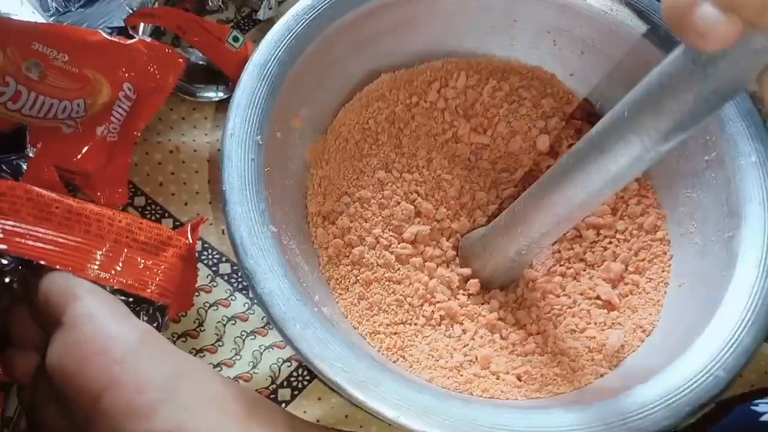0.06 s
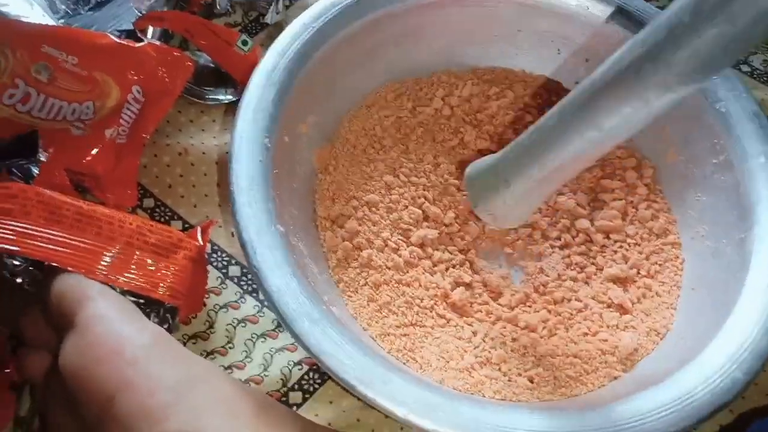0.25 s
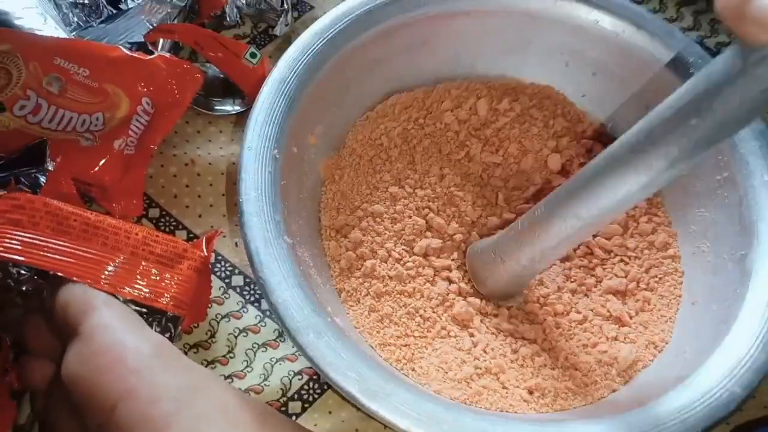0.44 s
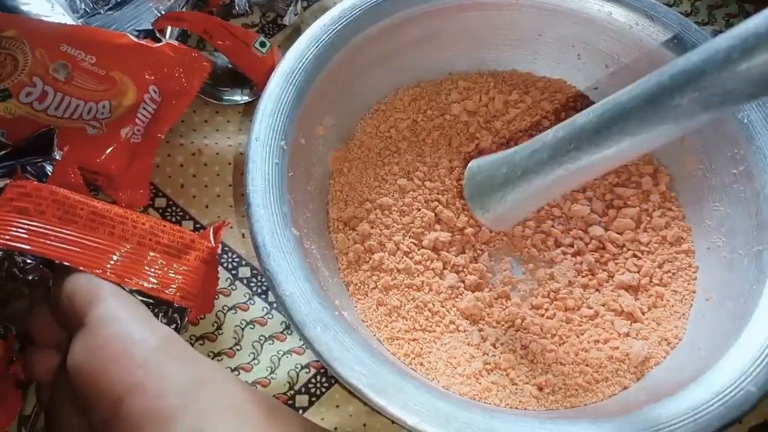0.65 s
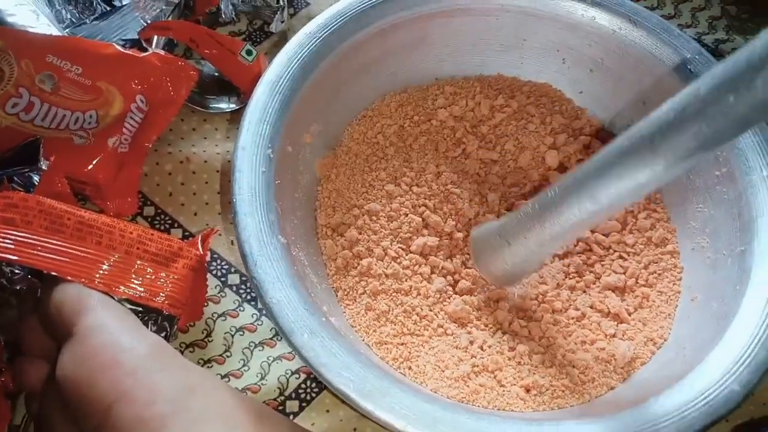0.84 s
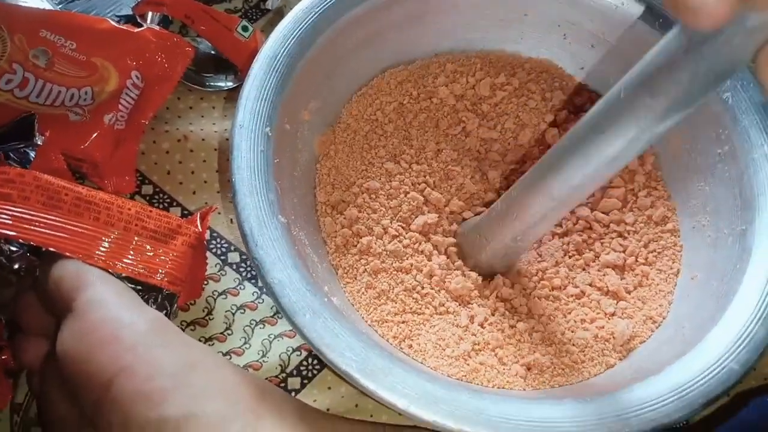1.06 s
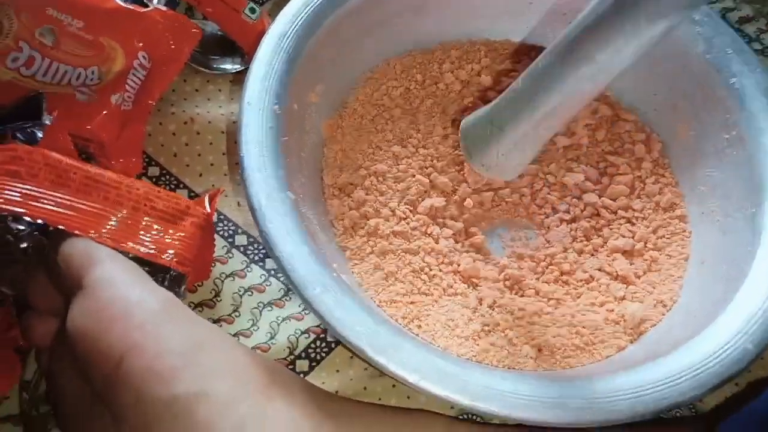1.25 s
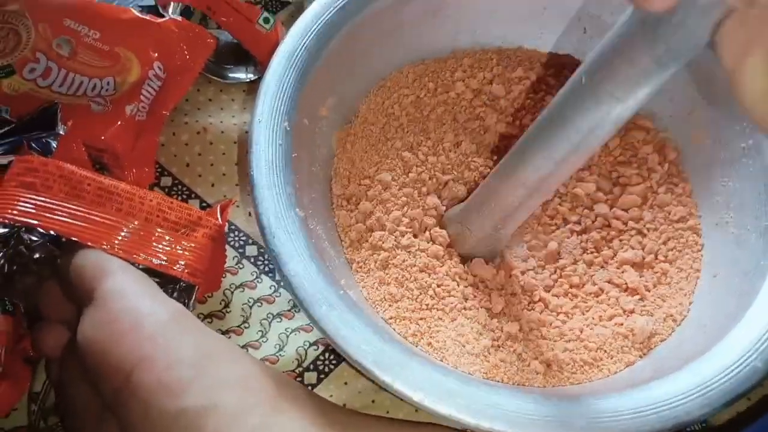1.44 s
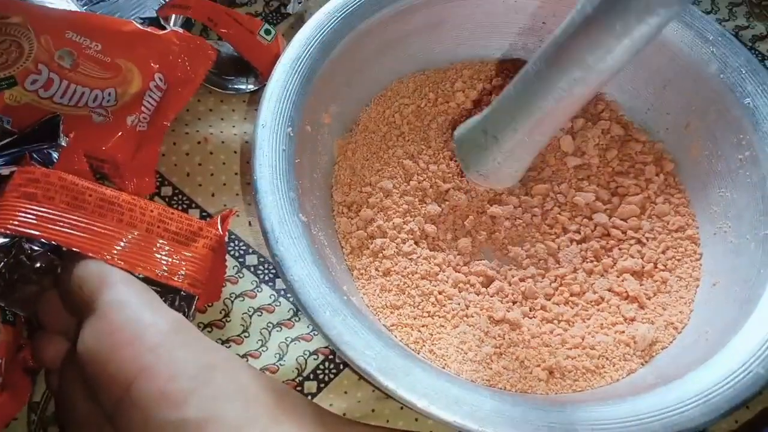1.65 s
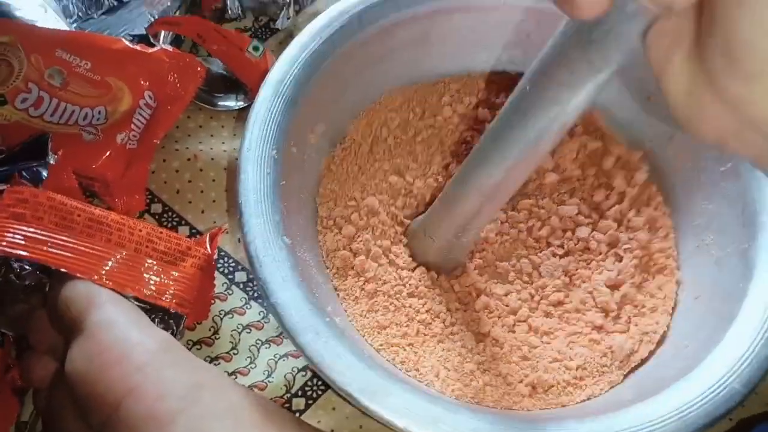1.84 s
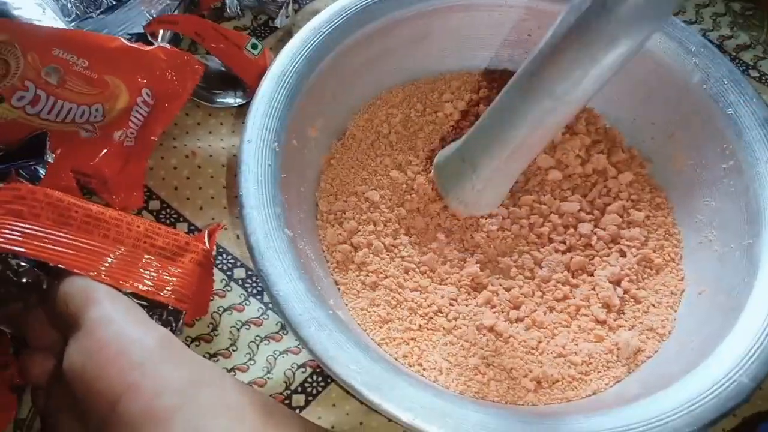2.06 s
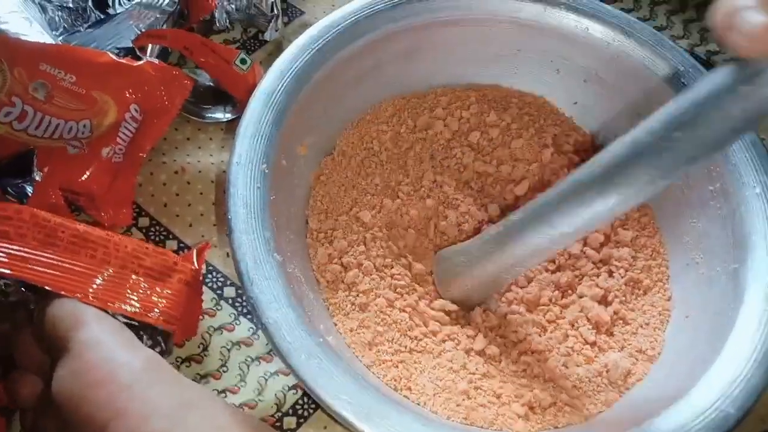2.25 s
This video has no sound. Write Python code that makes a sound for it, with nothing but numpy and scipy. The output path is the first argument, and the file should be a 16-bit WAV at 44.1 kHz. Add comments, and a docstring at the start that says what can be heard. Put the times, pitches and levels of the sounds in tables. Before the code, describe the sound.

A metal rod pounds dry biscuits in a metal bowl: six uneven blows, each a crunch, sharp crack and low thud, with light clinks and trickling crumbs between; close stereo microphone in a small kitchen.

```python
"""Pounding biscuits in a metal bowl

A metal rod strikes about three times a second, close by in a kitchen; the bowl stands on a covered surface.
Each blow crunches down through the crumbs and cracks on the bottom: dense clicks, shaped and coloured.
The bottom thuds, its support booms briefly and the bowl wall rings: damped modes, struck together.
Between blows the rod clinks on the bowl, loose crumbs trickle back and a faint squeak (narrow noise) sounds.
Diffuse room tails surround it all, over a faint steady background noise."""
import sys
import numpy as np
from scipy import signal
from scipy.fft import rfft, irfft
from scipy.io import wavfile
from scipy.ndimage import uniform_filter1d

SR = 44100
rng = np.random.default_rng(int(sys.argv[2]) if len(sys.argv) > 2 else 0)


def unload_wav(signal):
    """Save mono or channel-first audio to the path in sys.argv[1] as 16-bit WAV at rate SR, clipped to [-1, 1]."""
    wavfile.write(
        sys.argv[1],
        SR,
        np.round(np.clip(np.atleast_2d(signal).T, -1, 1) * 32767).astype(np.int16),
    )


N = 101429
T = np.arange(N) / SR  # time axis, s
HZ = np.fft.rfftfreq(4096, 1 / SR)  # frequency axis of the filters

# Blows of the rod: [t/s at the bottom, crack level/dB, crunch level/dB, crunch lead-in/s, tilt/dB per octave,
# thud level/dB, thud tilt/dB per octave, thud pitch factor, boom level/dB, wall ring level/dB, wall's strongest f/Hz]
BLOW_EVENTS = [(0.2231, -10.5, -23, 0.0033, -1, -7, -2.5, .97, -32.5, -35.5, 1160),
               (0.5708, -12.5, -21, 0.0029, -0.5, -7.5, -1, 0.97, -33, -52, 1480),
               (0.976, -26.5, -35, 0.015, 0, -27.5, -8.5, .9, -48.5, -67, 1880),
               (1.2331, -11, -23, 0.012, -1.5, -16, 3, .84, -36, -57, 2400),
               (1.6081, -20, -23, 0.018, -1.5, -18, -1.5, 1.156, -32.5, -33.5, 1110),
               (1.986, -16.5, -27.5, 0.024, -1.5, -15.5, 3, 0.6, -33, -61, 1800)]
# The rod knocks the bare bowl: [t/s, tick level/dB, tick decay/s, tilt/dB per octave,
# thud level/dB, boom level/dB, wall ring level/dB, wall's strongest f/Hz]
CLINK_EVENTS = [(0.001, -38, 0.021, 1, -54.5, -45.5, -32.5, 896),
                (0.287, -29, 0.0034, -1.5, -45, -47.5, -37.5, 1080),
                (0.6957, -21, 0.0085, -1.5, -30, -45.5, -30.5, 770),
                (0.745, -37.5, 0.011, 0, -67, -65, -39, 3150),
                (0.763, -39, 0.0081, -0.5, -49, -70, -51, 1480),
                (2.287, -27, 0.0047, -1, -44.5, -47, -39, 1210)]
# Crumbs slide and fall: [t/s of the peak, level/dB, rise/s, decay/s]
TRICKLE_EVENTS = [(0.249, -36, 0.0036, 0.0067), (0.602, -33.5, 0.0067, 0.004), (1.02, -37, 0.0016, 0.025),
                  (1.259, -33, 0.015, 0.0027), (1.358, -43.5, 0.0058, 0.024), (1.627, -31, .003, 0.0036),
                  (1.641, -35.5, 0.0049, 0.014), (1.971, -30.5, 0.0029, 0.0023), (2.006, -32, 0.012, 0.013),
                  (2.075, -48, 0.033, 0.018), (2.175, -48, 0.0015, 0.0007)]
# A faint squeak before a blow: (t/s of the peak, level/dB, f/Hz, half length/s)
SQUEAK_EVENT = (1.558, -63, 4080, .016)

# Modes of the loaded bowl bottom, before the pitch factor: [f/Hz, level/dB, t60/s]
BOTTOM_MODES = [(93, -22.5, 0.023), (146, -6, 0.047), (208.3, 2, 0.047), (247, -5, 0.053),
                (329, -9.5, 0.061), (405, -8, 0.056), (500.6, -11.5, 0.071)]
# Modes of the support under the bowl: [f/Hz, level/dB, t60/s]
SUPPORT_MODES = [(71.7, -9, 0.38), (98.44, 4.5, .38), (134, -7, 0.31), (222, -11, 0.25),
                 (272.5, -6.5, 0.36), (346.4, -10.5, 0.32)]
# Modes of the bowl wall, each the centre of a cluster: [f/Hz, level/dB, t60/s]
WALL_MODES = [(777, 0, 0.16), (833, -6.5, 0.4), (887, -11.5, 0.23), (1078, -3, 0.29), (1180, -5.5, 0.29),
              (1470, -4.5, 0.38), (1656, -2.5, 0.39), (1890, -4.5, .28), (2520, -10.5, 0.48),
              (3090, -4, 0.23), (4260, -11, 0.75), (4560, -7, 0.18), (4400, -9, 0.17), (6751, -16, 0.53)]

# Colour of the rod cracking on the bottom: [f/Hz, relative level/dB per Hz]
CRACK_COLOUR = [(100, 18.5), (400, -30), (700, -9), (1000, -16.5), (1500, -3), (2600, -2.5), (3700, -3.5),
                (5200, -14.5), (8300, -14.5), (11000, -24), (16000, -57.5)]
# Colour of the crumbs being crushed: [f/Hz, relative level/dB per Hz]
CRUNCH_COLOUR = [(100, -9), (400, -1), (750, 0.5), (1050, -3), (1700, -3.5), (2700, -6.5), (4200, -3),
                 (5300, -13), (6800, -14), (9000, -9), (11000, -26), (16000, -25.5)]
# Colour of the loose falling crumbs: [f/Hz, relative level/dB per Hz]
CRUMB_COLOUR = [(100, -22), (500, -4.5), (1500, 3.5), (4200, -1), (5500, -5.5), (9200, -6.5),
                (11000, -18.5), (16000, -19)]
# Colour of the rod ticking on bare metal: [f/Hz, relative level/dB per Hz]
TICK_COLOUR = [(100, -7), (300, -17), (550, -7.5), (800, 1.5), (1150, -7.5), (1550, 4), (2400, -5),
               (3300, -1), (4500, -9.5), (6000, -14), (9000, -14.5), (11000, -23.5), (16000, -32)]
# Colour of the background noise: [f/Hz, relative level/dB per Hz]
NOISE_COLOUR = [(15, 4), (25, -13), (427, -3.5), (863, -6.5), (1230, -16), (1370, -11), (1700, -14),
                (2000, -14), (2910, -16.5), (9320, -28.5), (16000, -46.5)]

# Left-right difference of the direct sound: [f/Hz, level/dB]
SIDE_BALANCE = [(300, 2.5), (560, -8.5), (850, 3.5), (1200, 2.5), (2600, 9), (3800, 3.5), (5600, 7),
                (8400, 4.5), (12000, -8.5)]
# Likeness of the grains at the two microphone ports: [f/Hz, shared share of power from 0 to 1]
PORT_LIKENESS = [(400, 0.89), (700, 0.62), (1200, 0.53), (2700, 0.21), (4500, 0.15)]
# How long the room rings: [f/Hz, t60/s]
ROOM_DECAY = [(60, 0.8), (250, 0.46), (1000, 0.6), (3000, 0.66), (8000, 0.41), (16000, 0.58)]
# How loud the room answers: [f/Hz, level/dB]
ROOM_COLOUR = [(60, -37.5), (200, -18), (500, -11), (1000, -12), (3000, -16), (8000, -9), (16000, -7)]

CRACK_RISE_S, CRACK_FALL_S = 0.0011, 0.0024
CRACK_TAIL_DB, CRACK_TAIL_S = -8, 0.0065  # a quieter, slower second decay of the crack
LEAD_DB, CRUNCH_FALL_S = -9.5, 0.013  # the crunch starts this far under its peak
SETTLE_DB, SETTLE_S = -28.5, 0.022  # crumbs go on shifting after a blow
GRAINS_PER_S, GRAIN_SPREAD_DB = 3500, 5
FRAGMENT_DB = 3  # rms depth of the chance resonances
SNAP = 8  # the rod meets the bottom: one click this many times the rms of the grains
PUSH_S, BOOM_RISE_S, THUD_LEAD_S = 0.0011, 0.0095, 0.00023
CLINK_PITCH = 1.8  # factor on the bottom modes when the rod only clinks
WALL_REACH_OCT, WALL_REST_DB = 0.24, -12  # the place of touch favours nearby modes
WALL_SPLIT = 0.05  # spread of each cluster, as a fraction of its frequency
SQUEAK_WIDTH_HZ = 230
LOW_ROOM_DB, BASS_PAN_DB = -18, 1
NOISE_DB = -59.5  # rms before each port's mix
MIC_LOW_HZ, EDGE_HZ = 56, 16300
PEAK_CEILING = 0.9  # of the soft limiter, full scale = 1


def amp(db):
    """Decibels to gain."""
    return 10 ** (np.asarray(db) / 20)


def evened(x):
    """Scales to rms 1."""
    return x / np.sqrt(np.mean(x ** 2) + 1e-20)


def read(points, hz):
    """Reads a table on a log-frequency axis."""
    f, value = np.transpose(points)
    return np.interp(np.log(hz + 1), np.log(f), value)


def colour(x, db):
    """Causal minimum-phase filter with the given gain at each frequency of HZ."""
    cepstrum = irfft(np.log(amp(db)))
    half = len(cepstrum) // 2
    cepstrum[1:half] *= 2
    cepstrum[half + 1:] = 0
    impulse = irfft(np.exp(rfft(cepstrum)))
    return signal.fftconvolve(x, impulse)[:len(x)]


def burst(s, rise, fall):
    """Swells exponentially up to time s, then dies away."""
    before, after = (s - T) / abs(rise), (T - s) / abs(fall)
    return np.exp(-np.minimum(np.maximum(before, after), 20))


def fading(t, t60):
    """Exponential decay that loses 60 dB in t60 seconds."""
    return np.exp(-np.log(1000) * t / t60)


def grains(s, envelope, spectrum, tilt_db=0, snap=0):
    """Tiny fractures of uneven size around time s; each lot of fragments has its own chance resonances."""
    out = np.zeros(N)
    start = max(int(s * SR) - SR // 10, 0)
    n = SR * 2 // 5
    size = amp(GRAIN_SPREAD_DB * np.minimum(rng.exponential(1, n), 4))
    clicks = size * rng.choice([-1, 1], n) * (rng.random(n) < GRAINS_PER_S / SR)
    # even out the local click level, so the envelope sets the loudness
    clicks = clicks / np.sqrt(abs(uniform_filter1d(clicks ** 2, size=300)) + 1e-6)
    clicks[round(s * SR) - start] += snap
    ripple = uniform_filter1d(rng.standard_normal(len(HZ)), size=20)
    ripple = evened(uniform_filter1d(ripple, size=16))
    db = read(spectrum, HZ) + tilt_db * np.log2(np.maximum(HZ, 300)) + FRAGMENT_DB * ripple
    db = db - 10 * np.log10(np.mean(amp(db) ** 2))  # the colour leaves the overall power alone
    shape = envelope[start:start + n]
    out[start:start + n] = colour(clicks[:len(shape)] * shape, db)
    return out


def ring(s, modes, rise, pitch=1, tilt_db=0, loose=0):
    """Damped modes struck at time s; loose scatters their phases (in cycles), tilt pivots on the third mode."""
    out = np.zeros(N)
    live = (T > s) & (T < s + 0.5)
    t = T[live] - s
    total = np.zeros(len(t))
    for hz, db, t60 in modes:
        gain = amp(db + tilt_db * np.log2(hz / modes[2][0]))
        phase = 2 * np.pi * (hz * pitch * t + loose * rng.random())
        total += gain * fading(t, t60) * np.sin(phase)
    out[live] = (1 - np.exp(-t / rise)) * total
    return out


def blow_grains():
    """The crunch swells louder as the rod presses down, then the rod cracks on the bottom and crumbs settle."""
    out = np.zeros(N)
    for s, crack_db, crunch_db, lead, tilt_db, *_ in BLOW_EVENTS:
        early = np.maximum(s - T, 0) / lead
        press = amp(LEAD_DB * early) * burst(s - lead, 0.0018, np.inf)
        settle = amp(SETTLE_DB) * burst(s, 0.006, SETTLE_S)
        release = burst(s, np.inf, CRUNCH_FALL_S) + settle
        out += amp(crunch_db) * grains(s, press * release, CRUNCH_COLOUR, tilt_db)
        tail = amp(CRACK_TAIL_DB) * burst(s, CRACK_RISE_S, CRACK_TAIL_S)
        crack = burst(s, CRACK_RISE_S, CRACK_FALL_S) + tail
        out += amp(crack_db) * grains(s, crack, CRACK_COLOUR, tilt_db, SNAP)
    return out


def clink_ticks():
    """Metal touches bare metal: short bursts of clicks that peak 1.5 ms after each event time."""
    out = np.zeros(N)
    for s, db, fall, tilt_db, *_ in CLINK_EVENTS:
        out += amp(db) * grains(s, burst(s + 0.0015, 0.0007, fall), TICK_COLOUR, tilt_db)
    return out


def trickles():
    """Loose crumbs slide and fall: soft swells of many small impacts."""
    out = np.zeros(N)
    for s, db, rise, fall in TRICKLE_EVENTS:
        out += amp(db) * grains(s, burst(s, rise, fall), CRUMB_COLOUR)
    return out


def rod_and_crumbs():
    """All the grainy contact sounds: fractures and impacts of rod, bowl and crumbs."""
    return blow_grains() + clink_ticks() + trickles()


def bottom():
    """The struck bowl bottom thuds in its damped modes and sets its support booming."""
    out = np.zeros(N)
    for s, *_, thud_db, tilt_db, pitch, boom_db, _, _ in BLOW_EVENTS:
        out += amp(thud_db) * ring(s - THUD_LEAD_S, BOTTOM_MODES, PUSH_S, pitch, tilt_db)
        out += amp(boom_db) * ring(s, SUPPORT_MODES, BOOM_RISE_S, loose=1)
    for s, *_, thud_db, boom_db, _, _ in CLINK_EVENTS:
        out += amp(thud_db) * ring(s, BOTTOM_MODES, PUSH_S, CLINK_PITCH)
        out += amp(boom_db) * ring(s, SUPPORT_MODES, PUSH_S, loose=0.75)
    return out


def wall(count=6):
    """The bowl wall rings in beating clusters of modes; the place of touch decides which speak."""
    out = np.zeros(N)
    for s, *_, ring_db, ring_hz in BLOW_EVENTS + CLINK_EVENTS:
        part = out[int(max(s, 0) * SR):][:SR // 2]  # a view: adding to it adds to out
        t = T[:len(part)]
        for hz, db, t60 in WALL_MODES:
            distance = np.log2(hz / ring_hz) / WALL_REACH_OCT
            favour = amp(WALL_REST_DB) + np.exp(-distance ** 2)
            cluster = np.zeros(len(t))
            for detune, phase in rng.uniform(-1.027, 1, (count, 2)):
                cluster += np.sin(2 * np.pi * (hz * (1 + WALL_SPLIT * detune) * t + phase))
            part += amp(ring_db + db) * favour * fading(t, t60) * cluster / np.sqrt(count)
    return out


def squeak():
    """A short narrow whistle: noise through a sharp resonance, swelling and fading smoothly."""
    s, db, hz, half = SQUEAK_EVENT
    resonance = -20 * np.log10(1 + ((HZ - hz) / SQUEAK_WIDTH_HZ * 2) ** 2)
    tone = evened(colour(rng.standard_normal(N), resonance))
    return amp(db) * tone * np.exp(-((T - s) / half) ** 2)


def kitchen(x, count=3):
    """Several random diffuse tails, each band dying at its own speed, cross-faded over time."""
    out = np.zeros(N)
    for k in range(count):
        hz, t, z = signal.stft(rng.standard_normal(SR * 3 // 4), SR, nperseg=256)
        decay = fading(t, read(ROOM_DECAY, hz)[:, None])
        tail = signal.istft(z * decay, SR, nperseg=256)[1]
        tail = tail * np.minimum(T[:len(tail)] / 0.0056, 1)  # fades in over 5.6 ms
        # the shares swing in turn and their powers add up to one
        share = np.sqrt(2 / count) * np.cos(np.pi * (T + k / count))
        out += signal.fftconvolve(x * share, tail / np.linalg.norm(tail))[:N]
    return out


def room_noise():
    """Faint steady background: random noise given a fixed colour."""
    noise = colour(rng.standard_normal(N), read(NOISE_COLOUR, HZ))
    return amp(NOISE_DB) * evened(noise)


def scene():
    """Two microphone ports share the bass; each adds its own random grains, mostly in the treble."""
    shared, low, shared_noise, whistle = rod_and_crumbs(), bottom(), room_noise(), squeak()
    low = low + amp(LOW_ROOM_DB) * kitchen(low)
    alike = np.clip(read(PORT_LIKENESS, HZ), 0.01, 0.99)
    common = colour(shared, 10 * np.log10(alike))
    ports = []
    for side in (1, -1):  # left, right
        own = colour(rod_and_crumbs(), 10 * np.log10(1 - alike))
        near = common + own + wall() + whistle
        direct = colour(near, side * read(SIDE_BALANCE, HZ) / 2)
        room = colour(kitchen(near), read(ROOM_COLOUR, HZ))
        bass = amp(side * BASS_PAN_DB / 2) * low
        noise = 0.77 * shared_noise + 1.04 * room_noise()
        ports.append(direct + room + bass + noise)
    return np.array(ports)


def record(dry):
    """The microphone loses the deepest bass; a soft limiter keeps peaks below full scale; the treble is cut."""
    low_cut = signal.butter(3, MIC_LOW_HZ, "high", fs=SR, output="sos")
    thin = signal.sosfilt(low_cut, dry)
    limited = thin / (1 + (thin / PEAK_CEILING) ** 6) ** (1 / 6)
    band_limit = signal.firwin(255, EDGE_HZ, window=("kaiser", 9), fs=SR)
    return signal.oaconvolve(limited, band_limit[None], "same")


dry = scene()
out = record(dry)
unload_wav(out)
```